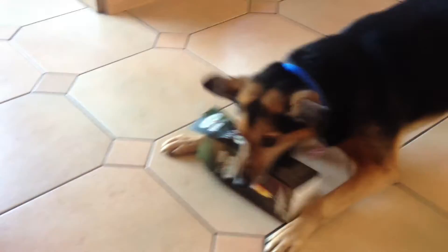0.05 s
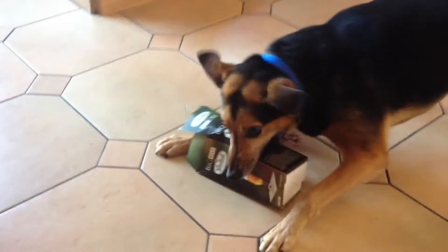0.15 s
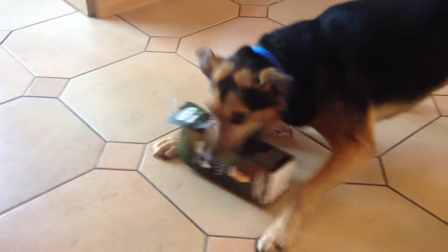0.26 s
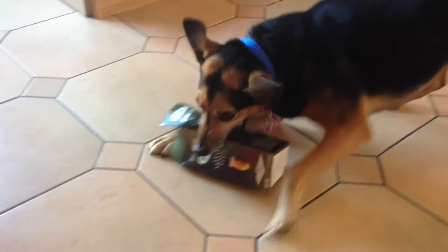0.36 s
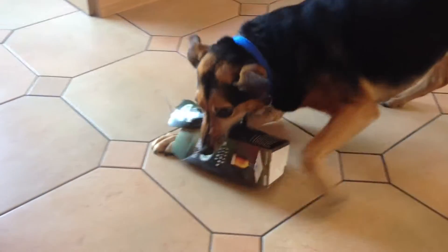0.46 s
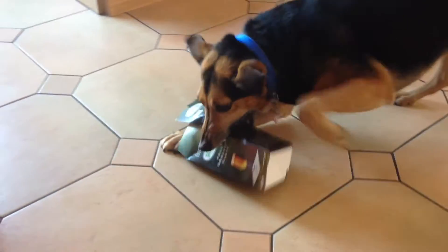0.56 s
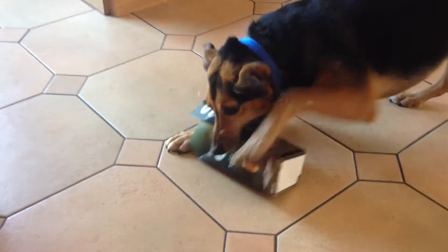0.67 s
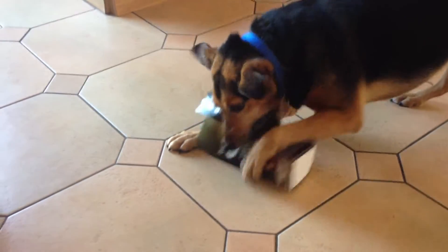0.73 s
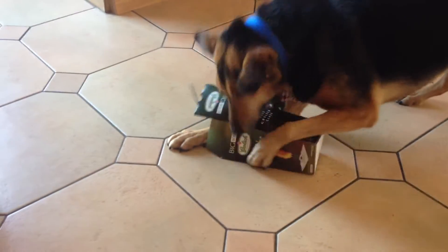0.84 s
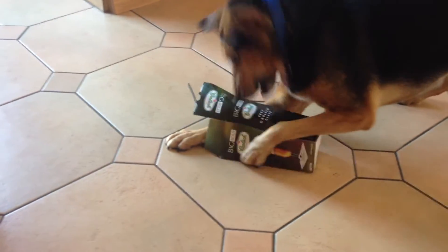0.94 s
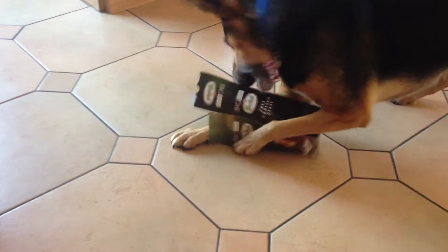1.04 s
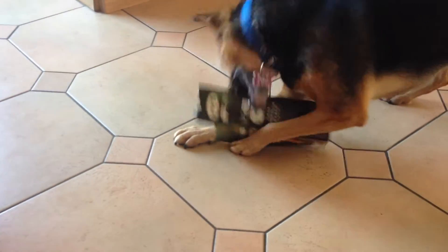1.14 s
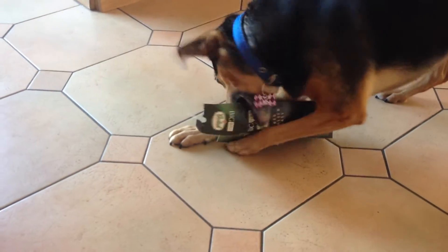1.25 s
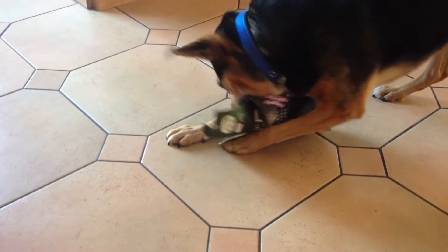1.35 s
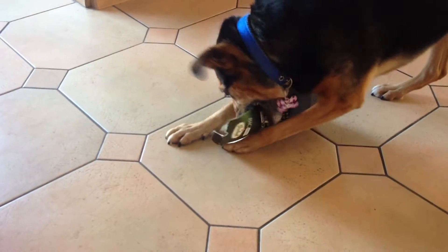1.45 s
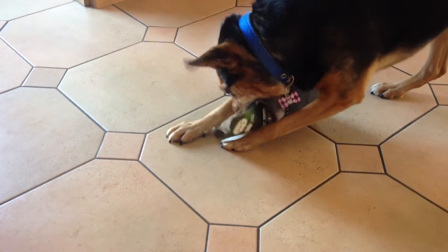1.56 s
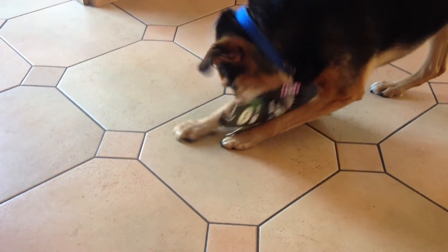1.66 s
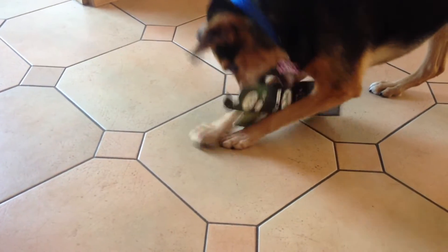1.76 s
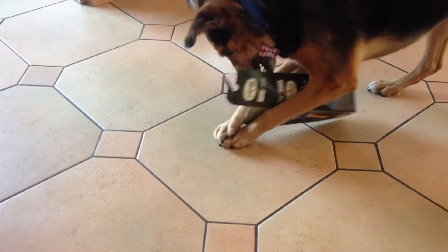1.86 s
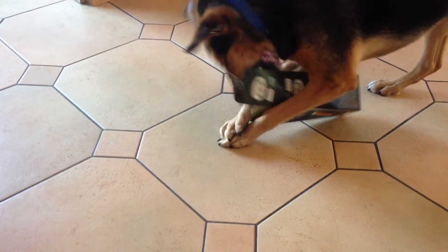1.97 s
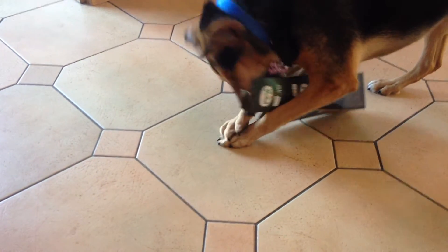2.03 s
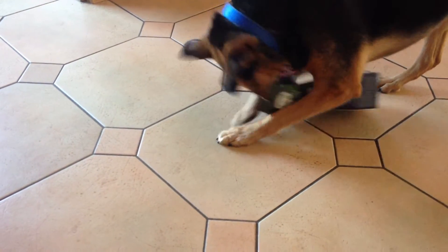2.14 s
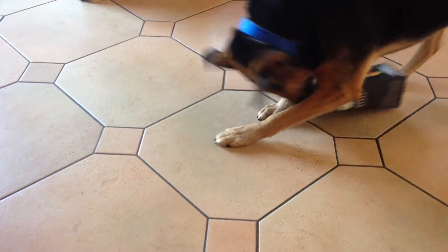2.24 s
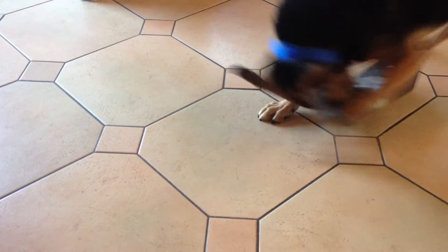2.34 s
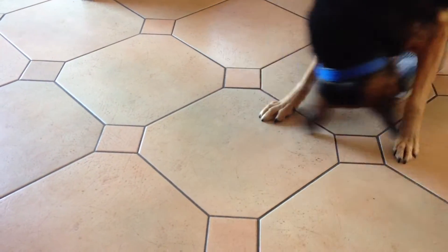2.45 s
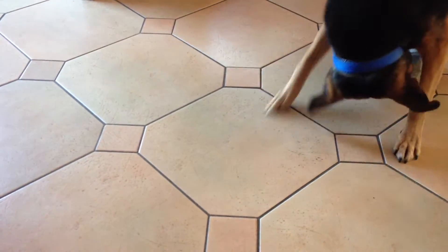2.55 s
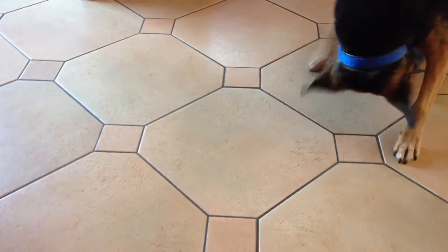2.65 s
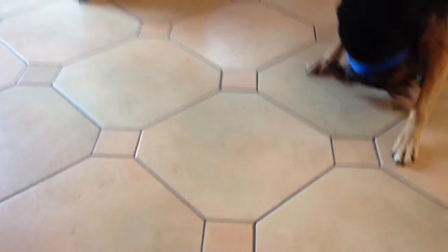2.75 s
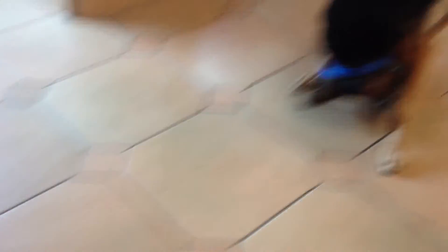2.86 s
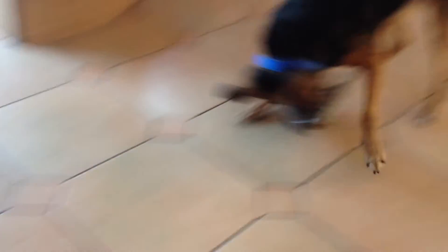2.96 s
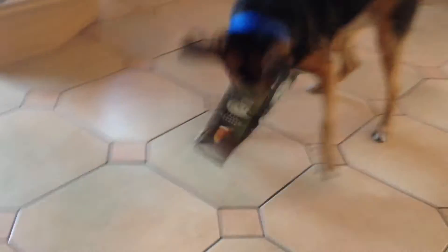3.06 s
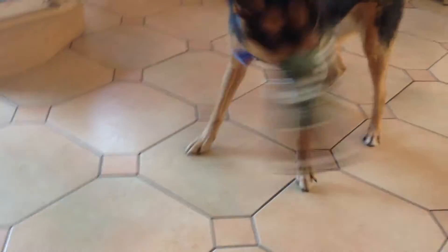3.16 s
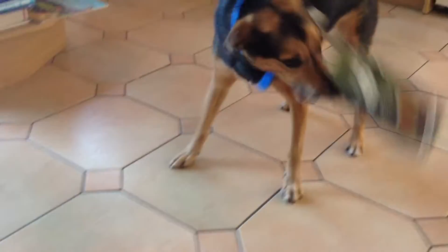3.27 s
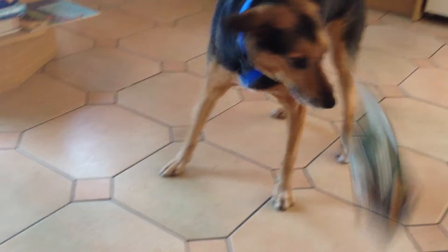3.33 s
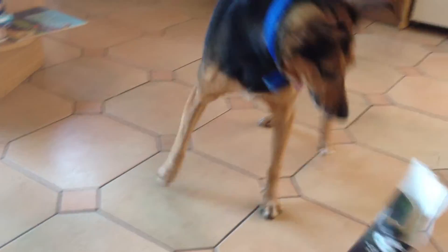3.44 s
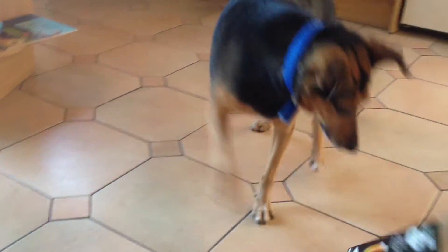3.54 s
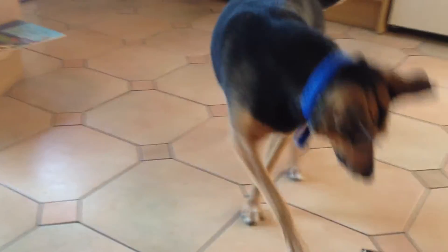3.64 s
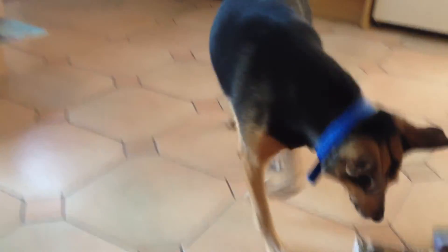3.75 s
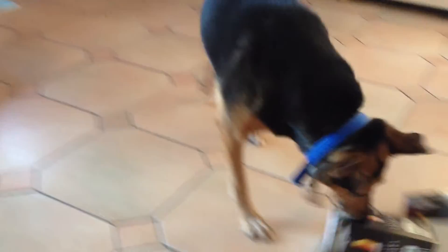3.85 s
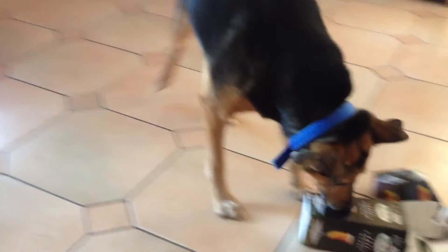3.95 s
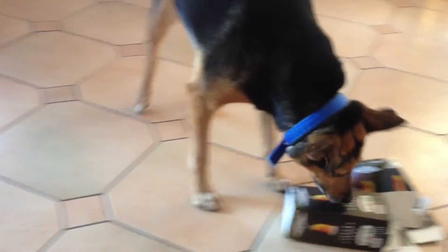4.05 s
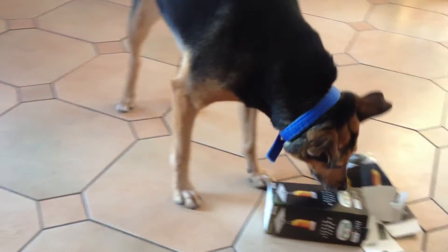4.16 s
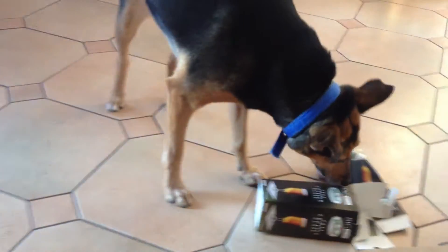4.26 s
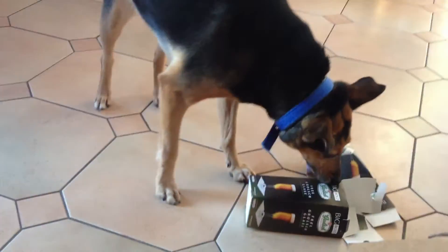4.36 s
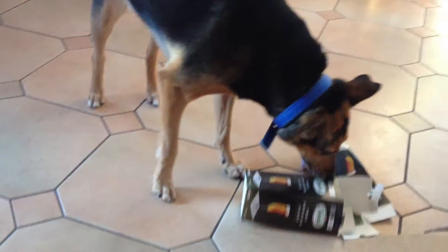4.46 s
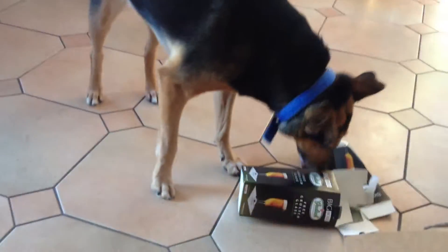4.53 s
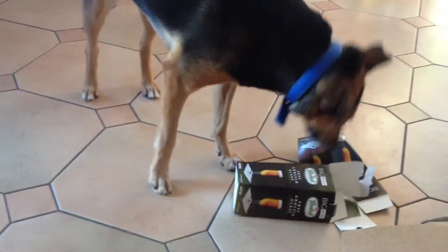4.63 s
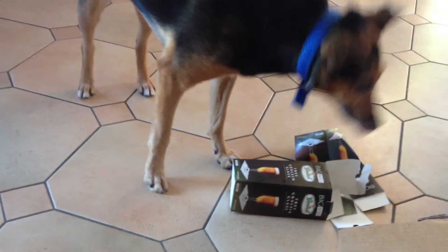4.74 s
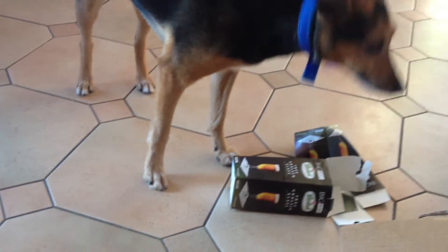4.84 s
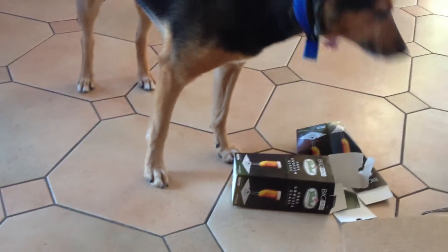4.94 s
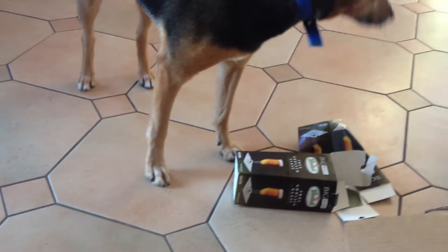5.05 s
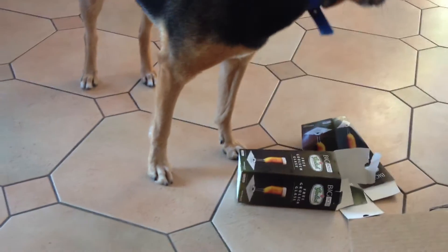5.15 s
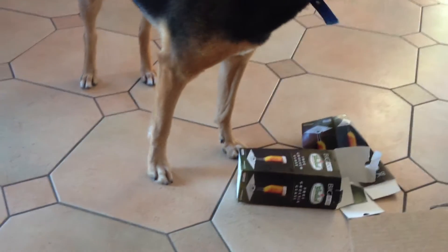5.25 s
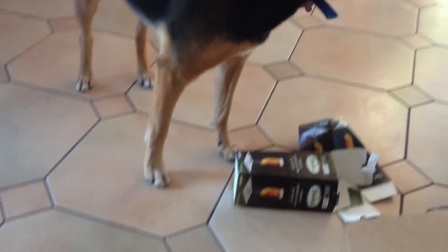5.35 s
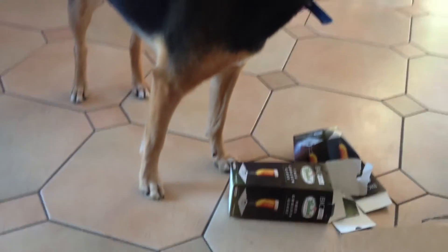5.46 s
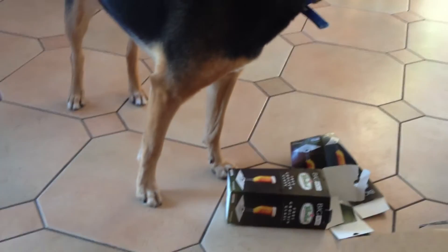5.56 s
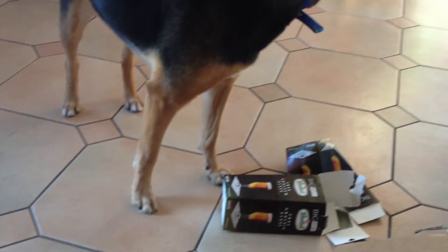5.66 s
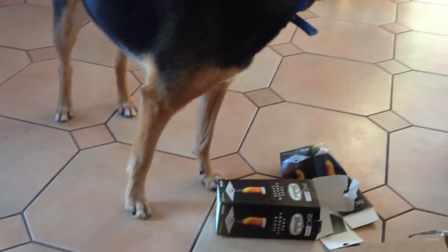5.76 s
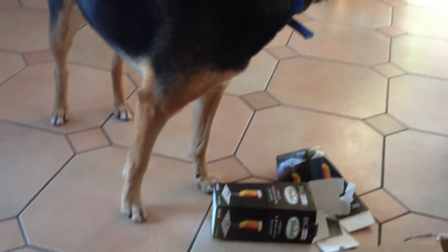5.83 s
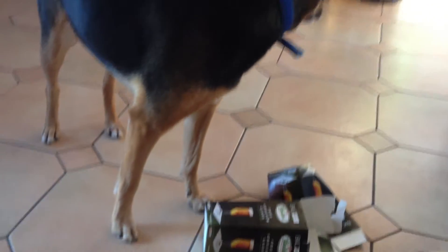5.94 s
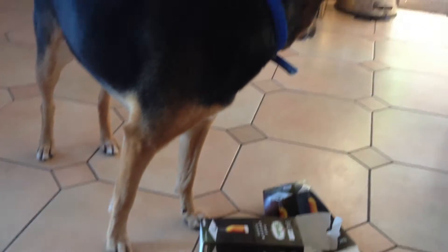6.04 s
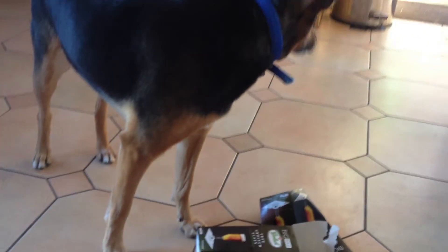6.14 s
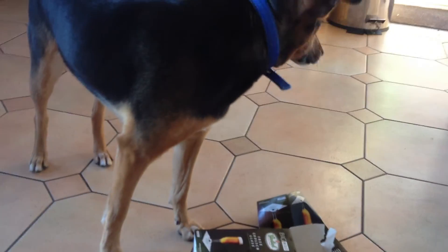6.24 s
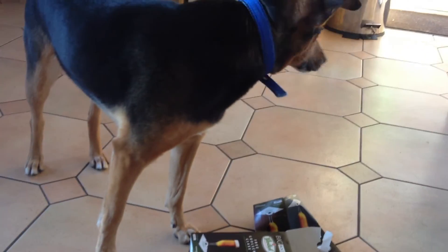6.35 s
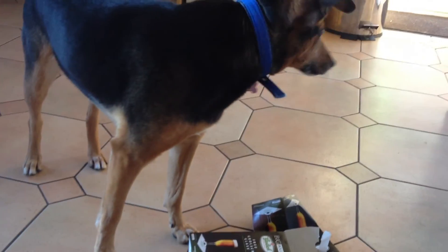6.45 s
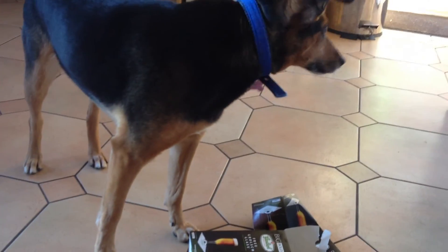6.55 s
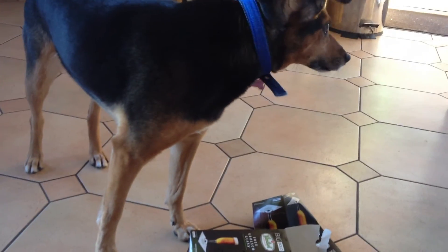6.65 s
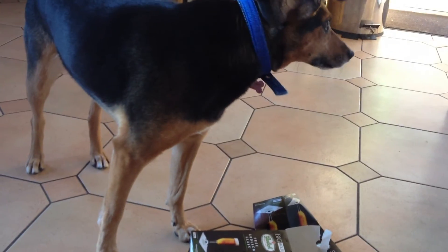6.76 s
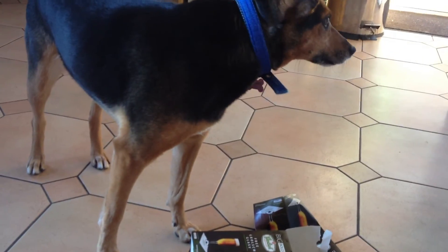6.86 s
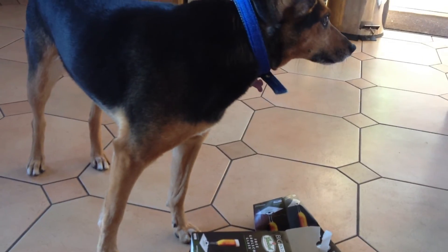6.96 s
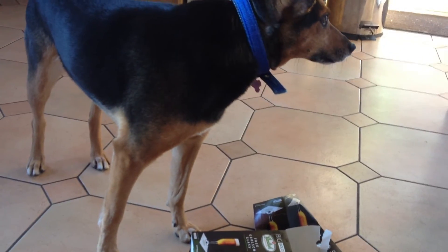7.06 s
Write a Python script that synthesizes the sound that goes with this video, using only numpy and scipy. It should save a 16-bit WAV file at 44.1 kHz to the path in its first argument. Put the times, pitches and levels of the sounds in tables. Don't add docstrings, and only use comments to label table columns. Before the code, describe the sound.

In a hard, reverberant kitchen a dog slaps, crushes and drags a thin cardboard box over tiles, with hollow knocks, snapping folds, claw ticks and a bright clink of collar tags. A hard knock comes early and the loudest when the box lands midway. Then only small scrapes and ticks remain, a thin nose whistle and sparrows chattering outside, over faint fridge hum and hiss from a small close microphone.

```python
import sys
import numpy as np
from scipy import signal
from scipy.fft import rfft, irfft, next_fast_len
from scipy.io import wavfile
from scipy.ndimage import uniform_filter1d, map_coordinates

SR = 44100
rng = np.random.default_rng(int(sys.argv[2]) if len(sys.argv) > 2 else 0)


def generate_wav(signal):
    frames = np.transpose(np.atleast_2d(signal))
    scaled = np.clip(frames, -1, 1) * 32767
    pcm = np.round(scaled).astype(np.int16)
    wavfile.write(sys.argv[1], SR, pcm)


def volts_from_db(level):
    exponent = np.asarray(level, float) / 20
    return 10 ** exponent


N = 313064


def unit(x):
    return x / np.sqrt(np.mean(x ** 2) + 1e-20)


def peak(x):
    return x / np.abs(x).max()


def add(track, s, x):
    part = track[max(round(s * SR), 0):][:len(x)]
    part += x[:len(part)]


def along(points, hz):
    f, v = np.transpose(points)
    return np.interp(np.log(hz + 1), np.log(f + 1), v)


def wobble(rate):
    knots = rng.standard_normal(int(N * rate / SR) + 4)
    return map_coordinates(knots, [np.arange(N) * rate / SR])


def filtered(x, response):
    m = next_fast_len(len(x) + 8192)
    return irfft(rfft(x, m) * response(np.fft.rfftfreq(m, 1 / SR)), m)[:len(x)]


def modes(table):
    return lambda f: sum((-1) ** k * volts_from_db(db) * 1j * f * w / (c * c - f * f + 1j * f * w)
                         for k, (c, w, db) in enumerate(table))


def blows():
    # time in seconds, peak in dB, then thud, edge and crack
    # in dB against the peak
    knocks = [
        (0.657, -21, 0.5, -8, -12.5),
        (0.75, -8, -13, -6.5, -25.5),
        (0.812, -30, -40.5, 6, 1),
        (3.441, -3, -17.5, -11.5, -18.5),
        (3.636, -42, -19.5, -16, -22),
    ]
    slaps = [(0.078, -31.5, 6.5, -1, -19), (0.089, -16.5, -20, -11.5, -33), (0.304, -18.5, -4, -10.5, -29),
             (1.168, -26, -4, -2.5, -32), (1.6666, -37, -2.5, 1, -3), (1.797, -31, -9, -3.5, -28),
             (2.158, -32.5, -34, -11, -22), (2.21, -13.5, -14.5, -10.5, -23), (2.369, -23.5, -13, -3.5, -4),
             (3.258, -23, -2.5, -6, -14.5), (3.296, -25.5, -13.5, -12, -15.5),
             (3.695, -17.5, -5.5, -3, -17.5), (3.9261, -19.5, -5.5, -16.5, -12.5)]
    crushes = [(0.096, -27, -18, -25, -13), (0.334, -24, -19, -32.5, -43), (0.748, -20.5, 0, -17, -25.5),
               (0.986, -45.5, -15, 7, 4), (1.333, -35.5, -9, -2.5, -20), (1.86, -34.5, 2, -5, -11),
               (1.545, -43.5, -6, 3, -21), (2.351, -31.5, 6, -29, -13), (2.387, -28.5, -18, -23, -7),
               (2.714, -25, -2.5, 0, -10.5), (2.732, -24, -17, -15.5, -12), (3.005, -30, 4, -14, -27),
               (3.04, -34, -11, -15.5, -36), (4.559, -42, -12, -5, -5.5), (4.981, -49, -22, -20, -38),
               (5.002, -40.5, -21, -13, -14)]
    out = np.zeros(N)
    for row in knocks:
        add(out, row[0] - .001, blow(row, contact_s=0.017, rise_s=0.00044, width_hz=70))
    for row in slaps:
        add(out, row[0] - .001, blow(row, contact_s=0.049, rise_s=0.00065, width_hz=300))
    for row in crushes:
        add(out, row[0] - .005, blow(row, contact_s=.12, rise_s=.01, width_hz=250))
    return kitchen(out, wet_db=3)


def blow(row, contact_s, rise_s, width_hz):
    # time in seconds, pitch of the free panel in Hz, side panel in dB,
    # deep over small hollow in dB
    lie = [(.08, 594, -10.5, -5.5), (.3, 596, -8, 2), (.66, 660, -9.5, -5), (1.2, 666, -8.5, -10.5),
           (1.67, 660, -9, 14), (1.8, 790, -22, 0), (2.15, 625, -17, -1), (2.21, 790, -3, -0.5),
           (2.39, 775, -4, 1.5), (2.73, 540, -11.5, 6.5), (3.04, 604, -5.5, -6), (3.26, 730, -7.5, 6),
           (3.3, 736, 4, -1), (3.44, 793, -8, -2), (3.695, 703, 0.5, -10), (3.93, 777, -2, -8),
           (4.62, 633, -8, -2), (5.0, 766, -9, 7)]
    # pitch in Hz, width in Hz, level in dB
    folds = [(1250, 330, 0), (2200, 1500, -5), (4060, 3200, -9.5)]
    # pitch in Hz, width in Hz, level in dB
    surface = [(7260, 1700, 9.5), (12700, 9000, 3.5)]
    s, db, thud_db, edge_db, crack_db = row
    when, *columns = np.transpose(lie)
    hz, side_db, deep_db = [np.interp(s, when, column) for column in columns]
    t = np.arange(SR // 6) / SR

    def grit(length_s):
        return (1 - np.exp(-t / rise_s)) * volts_from_db(-60 * t / length_s) * rng.standard_normal(len(t))

    push = np.exp(-(t / 0.00036 - 2) ** 2) * 0.00045 / rise_s + contact_s * 9 * grit(contact_s)
    panel = filtered(push, modes([(0.72 * hz, 1.4 * width_hz, -8), (hz, width_hz, 0),
                                  (1170, 120 + width_hz, side_db)]))
    hollow = modes([(205 * volts_from_db(rng.normal(0, .5)), 60, deep_db / 2),
                    (305 * volts_from_db(rng.normal(0, .5)), 80, -deep_db / 2)])
    thud = filtered(push, lambda f: hollow(f) * 1j * f / (1j * f + 120))

    first_touch = 5 * .0004 / rise_s * (np.arange(len(t)) == 20)
    moved_folds = [(fold_hz * volts_from_db(rng.normal(0, .6)), *rest) for fold_hz, *rest in folds]
    edge = filtered(first_touch + grit(1.2 * contact_s + 0.0064), modes(moved_folds))
    crack = filtered((1 - np.exp(-t / 0.00024)) * grit(1.3 * contact_s + 0.0067), modes(surface))
    parts = peak(panel) + volts_from_db(thud_db) * peak(thud) + volts_from_db(edge_db) * peak(edge) + volts_from_db(crack_db) * peak(crack)
    return volts_from_db(db - 3) * parts


def taps():
    # time in seconds, peak in dB, then thud, edge and crack in dB against the peak
    held = [(0.219, -28, 1, -21, -26.5), (0.342, -17.5, -7, -8, -24), (.7515, -12.5, -13.5, -3.5, -19),
            (1.036, -22.5, -9, -1.5, -11), (1.14, -29, 2, -17, -11), (1.197, -13.5, -24, -2.5, -24),
            (1.814, -27, -5, -24, -19), (1.872, -37, -1.5, -21, -9), (1.942, -26.5, -16, -36, -35),
            (3.695, -10.5, -12.5, -33, -30), (3.925, -20.5, -3.5, -2.5, -8), (4.613, -35, 7.5, -3, -7)]
    # time in seconds, peak in dB, edge in dB
    ticks = [(0.0912, -39, 12), (0.0963, -33, 9), (.221, -44, -2), (.265, -42, -10), (.278, -46, 10),
             (.3035, -40, 0), (0.3246, -31, -2), (.333, -33, 7), (0.355, -26.5, -22), (0.635, -42, -3),
             (0.7026, -35, 11), (.706, -29.5, 8), (0.7105, -38.5, 14), (0.737, -20.5, -1),
             (.7405, -26.5, 11), (0.7453, -22, 4), (0.7515, -19, 3), (0.8103, -32, 1), (.986, -41, -6),
             (1.142, -41, 4), (1.171, -27, -4), (1.2, -32, 4), (1.5444, -53, 11), (1.666, -44, -5),
             (1.679, -37, -3), (1.765, -44, -8), (1.7947, -38, 9), (2.157, -55, 4), (2.348, -45, -2),
             (2.3874, -20.5, -16), (2.579, -42, -12), (2.599, -28.5, -17), (2.619, -44, -15),
             (2.674, -32, -14), (2.684, -33, -14), (2.7177, -26, -8), (3.0883, -42, 9), (3.184, -27, -27),
             (3.298, -39.5, 14.5), (3.444, -20, 4), (3.702, -22, -4), (4.3958, -53, -8), (4.4947, -39, -20),
             (4.785, -46, -5), (4.8612, -56.5, -12), (4.8947, -62, -12), (4.9082, -61, -8), (4.94, -55, -1),
             (5.0037, -42.5, 7), (5.514, -56, -20), (5.681, -49, -1.5)]
    out = np.zeros(N)
    for row in held:
        add(out, row[0] - .001, blow(row, contact_s=.008, rise_s=.0004, width_hz=110))
    for s, db, edge_db in ticks:
        row = (s, db - 20, -10, edge_db + 20, 20)
        add(out, s - .0007, blow(row, contact_s=.002, rise_s=.0004, width_hz=300))
    return kitchen(out, wet_db=-2)


def rubbing():
    # low end in Hz, high end in Hz
    bands = [(110, 370), (420, 1500), (1500, 8300), (6000, 17000)]
    # frequency in Hz, level in dB per Hz
    card = [(35, -69.5), (60, -20), (207, -15), (398, -13.5), (651, -11), (803, -12), (1700, -21.5),
            (2090, -17.5), (5090, -21.5), (6580, -22), (9570, -20), (14600, -19.5), (16000, -60)]
    # start in seconds, length in seconds, pitch in Hz, level in dB, spread in Hz
    scrapes = [(.748, .012, 2130, -34, 200), (2.415, .035, 3450, -44, 600), (2.945, .06, 620, -39, 25),
               (3.035, .02, 1830, -50, 80), (3.04, .02, 1250, -47, 80), (3.71, .07, 1220, -41, 90),
               (3.935, .06, 1270, -45, 80), (3.3, .039, 2660, -53, 400), (3.465, .07, 775, -30, 50),
               (3.55, .075, 775, -43, 50), (3.635, .055, 790, -45, 50), (4.378, .06, 1200, -65, 120),
               (4.495, .04, 5870, -65, 400), (5.45, .19, 3310, -67, 893)]
    skids = [
        (.56, .079, 1485, -57, 298),
        (.705, .044, 1450, -43, 200),
        (2.875, .07, 500, -46, 40),
    ]
    slips = (rng.random(N) < .02) * rng.uniform(-0.94, 1, N) ** 3
    clumps = volts_from_db(1.5 * wobble(40) + 2.5 * wobble(130))
    singing = glides(bent(scrapes, 1) + bent(skids, 1.24), trill=0, shake_rate=700)
    out = singing * volts_from_db(1.1 * wobble(66))
    for (lo, hi), gain in zip(bands, movements()):
        drive = (.7 * unit(slips) + rng.standard_normal(N)) * clumps * volts_from_db(1.5 * wobble(25))

        def band(f):
            slopes = np.sqrt((1 + (lo / (f + 1)) ** 8) * (1 + (f / hi) ** 8))
            return volts_from_db(along(card, np.minimum(f, 14500))) / slopes

        out += volts_from_db(-5.5) * gain * unit(filtered(drive, band))
    return kitchen(out, wet_db=4.5)


def movements():
    # time in seconds, length in seconds, body in dB, then drumming
    # and rasp in dB against the body
    jolts = [
        (0.0, 0.033, -44, 10.5, -7),
        (2.223, 0.059, -31.5, -4.5, -12.5),
        (2.363, 0.13, -33, -4.5, -13),
        (3.259, 0.031, -37, -24, -10),
        (3.694, 0.13, -50.5, 12, 9.5),
        (3.924, 0.15, -39.5, -7, -6.5),
        (4.387, 0.13, -60.5, -4, 7),
        (5.0, 0.068, -60, 12.5, 9),
    ]
    # time in seconds, length in seconds, body in dB, drumming in dB
    presses = [(.11, 0.31, -61.5, 17.5), (.244, 0.28, -49, 3), (.476, 0.29, -69.5, -7.5),
               (.73, 0.28, -41, -10), (.896, 0.11, -50, -20), (1.01, 0.055, -41, -4),
               (1.12, 0.17, -44.5, -1), (1.26, 0.31, -48.5, -23), (1.47, 0.72, -53, -12.5),
               (1.753, .15, -68, -1), (1.865, 1, -54.5, 0), (2.16, 0.068, -64, 11), (2.674, 0.41, -50, 2.5),
               (2.78, 0.24, -47.5, -11.5), (2.62, 0.067, -45, 4), (2.885, 0.05, -46.5, -8.5),
               (2.958, 0.035, -46.5, 2), (1.36, 0.13, -44, -8), (3.058, 0.098, -44, -7.5),
               (3.422, 0.058, -46.5, -13.5), (3.52, 0.56, -52.5, -5), (3.754, 0.05, -39.5, -17),
               (4.08, 0.044, -48, -29), (4.21, 0.084, -65.5, -14), (4.644, 0.072, -54, -0.5),
               (4.748, 0.14, -66.5, -8), (5.518, 0.26, -70, -4)]
    # time in seconds, length in seconds, rasp in dB, fizz in dB
    drags = [(.06, 0.43, -54, 4), (.294, 0.12, -50, -14), (.408, 0.064, -50, -5), (.55, 0.2, -60, -12.5),
             (.66, 0.11, -55.5, -11.5), (.73, 0.13, -64.5, 16.5), (.842, 0.1, -47, -4),
             (1.01, 0.052, -45, 0), (1.12, 0.2, -44.5, -5.5), (1.47, 0.9, -54.5, -36),
             (1.753, 0.18, -53.5, -2), (1.97, 1, -58.5, -5.5), (2.52, .15, -69, 2), (2.6, 0.034, -63, 21.5),
             (2.69, 0.045, -50.5, 8), (2.4, 0.082, -53, 13), (1.57, 0.06, -56, -22), (1.89, 0.036, -56, -8),
             (1.42, 0.066, -55, -17), (4.42, .06, -58.5, -12), (2.89, .1, -58.5, 7),
             (1.35, 0.11, -50.5, -17), (.36, .04, -54, 4.5), (2.764, 0.069, -41.5, -21),
             (2.958, 0.12, -47, 2), (3.23, 0.3, -54, -12.5), (3.275, 0.023, -53.5, 4.5),
             (3.498, 0.097, -46.5, -13), (4.3, 0.27, -68.5, 0), (4.5, 0.2, -57, -13),
             (4.644, 0.19, -57, -6), (5.518, 0.34, -67, -19)]

    def jolt(pick):
        return [(s, .012, length, db + pick(drum, rasp)) for s, length, db, drum, rasp in jolts]

    def swell(rows, tilted):
        return [(s, 0.78 * length, length, db + tilted * tilt) for s, length, db, tilt in rows]

    drumming = strokes(jolt(lambda drum, rasp: drum) + swell(presses, True))
    body = strokes(jolt(lambda drum, rasp: 0) + swell(presses, False))
    rasping = strokes(jolt(lambda drum, rasp: rasp) + swell(drags, False))
    fizz = strokes(jolt(lambda drum, rasp: rasp - 19.5) + swell(drags, True))
    return [drumming, body, rasping, fizz]


def strokes(moves):
    s, rise, fall, db = np.transpose(moves)[..., None]
    fade_db = 15.5
    ms = np.arange(0, N / SR, 1 / 1000)
    lost = np.maximum((s - ms) / np.abs(rise), (ms - s) / np.abs(fall))
    gain = np.sqrt(np.sum(volts_from_db(db - fade_db * lost) ** 2, axis=0))
    return np.interp(np.arange(N) / SR, ms, gain)


def glides(table, trill, shake_rate):
    out, shake = np.zeros(N), wobble(shake_rate)
    for s, length, first_hz, last_hz, db, depth_hz in table:
        u = np.arange(int(length * SR)) / (length * SR)
        buzz = trill * np.sin(2 * np.pi * 330 * length * u) + np.roll(shake, -round(s * SR))[:len(u)]
        hz = first_hz + (last_hz - first_hz) * u ** .8 + depth_hz * buzz
        swell = np.sin(np.pi * u ** 0.73) ** .7
        add(out, s, volts_from_db(db) * swell * np.sin(2 * np.pi * np.cumsum(hz) / SR))
    return out


def bent(rows, ratio):
    return [(s, length, hz, hz * ratio, db, depth) for s, length, hz, db, depth in rows]


def collar():
    # pitch in Hz, time to fall 60 dB in seconds
    tags = [
        [(6782, .12)],
        [(7840, .17), (14220, .13)],
        [(12020, .06)],
        [(14420, .17)],
    ]
    # time in seconds, then the level of each tag in dB
    clinks = [
        (0.45, -52.5, -52, -72, -52),
        (1.150, -53, -49, -34, -44.5),
        (1.163, -28.5, -38, -32, -32),
        (1.18, -37, -48, -50, -40),
        (1.236, -48, -58, -70, -58),
        (3.402, -50, -62.5, -48.5, -55),
        (3.411, -43.5, -59, -57.5, -36),
        (5.04, -54, -44.5, -49, -47),
        (5.063, -54, -62, -71, -65),
    ]
    # time in seconds, level in dB
    buckle = [
        (0.0, -48.5),
        (3.844, -57),
        (3.895, -59),
    ]
    out, t = np.zeros(N), np.arange(SR // 3) / SR

    def ring(hz, t60):
        return volts_from_db(-60 * t / t60) * np.sin(2 * np.pi * hz * t) * (1 - np.exp(-t / 0.00054))

    for s, *levels in clinks:
        tick = .15 * volts_from_db(max(levels) - 60 * t / .004) * np.diff(rng.standard_normal(len(t) + 1))
        ringing = sum(volts_from_db(db) * ring(hz, t60) for db, tag in zip(levels, tags) for hz, t60 in tag)
        add(out, s, tick + ringing)
    for s, db in buckle:
        add(out, s, volts_from_db(db) * ring(5866, .4))
    return kitchen(out, wet_db=-6.0)


def thumps():
    # start in seconds, level in dB, length in seconds
    weights = [(.068, -67, .08), (.324, -59, 0.099), (.657, -58, .08), (.74, -56.5, .12),
               (2.38, -72, 0.074), (2.6, -67, .08), (2.72, -70, .08), (3.435, -59, .08), (3.69, -65, 0.075),
               (3.92, -54, 0.081), (5.0, -85, .08)]
    # pitch in Hz, width in Hz, level in dB
    floor = [(32.02, 40, -3.5), (95, 80, 3.5)]
    out = np.zeros(N)
    for s, db, length in weights:
        u = np.arange(int(length * SR)) / (length * SR)
        rumble = unit(filtered(rng.standard_normal(len(u)), modes(floor)))
        add(out, s, volts_from_db(db) * np.sin(np.pi * np.sqrt(u)) ** 2 * rumble)
    return out


def nose():
    # time in seconds, pitch in Hz, level in dB
    sniff = [
        (5.489, 12240, -80),
        (5.51, 13270, -76),
        (5.55, 13600, -76),
        (5.6, 12900, -73),
        (5.645, 11330, -75.5),
        (5.66, 10900, -95),
    ]
    s, hz, db = np.transpose(sniff)
    t = np.arange(N) / SR
    pitch = uniform_filter1d(np.interp(t, s, hz), size=600) + 60 * wobble(200)
    phase = 2 * np.pi * np.cumsum(pitch) / SR
    nostrils = np.sin(phase) + volts_from_db(-9 + 5 * wobble(25)) * np.sin(.83 * phase)
    return volts_from_db(np.interp(t, s, db, left=-140, right=-140) + 3 * wobble(40)) * nostrils


def sparrows():
    # start in seconds, length in seconds, pitch in Hz, level in dB, trill depth in Hz
    chirps = [(2.69, 0.023, 4520, -57, 20), (2.712, 0.022, 4480, -37.5, 30), (5.375, .03, 11600, -80, 30),
              (6.7, .04, 2298, -75, 39), (6.72, .2, 3730, -77, 60), (5.31, 0.026, 11600, -78.5, 30),
              (4.93, 0.048, 3950, -65, 150), (5.458, 0.065, 6110, -61, 180),
              (5.693, 0.053, 5730, -60.5, 104), (5.693, 0.046, 6260, -63, 87), (5.79, .04, 7410, -63.5, 90),
              (5.82, .11, 4290, -67.5, 199), (5.905, 0.065, 5630, -62, 85), (5.905, 0.058, 6200, -58.5, 64),
              (5.93, 0.045, 2310, -73, 47), (6.01, 0.058, 7620, -66, 60), (6.03, 0.065, 3980, -68, 200),
              (6.301, .04, 5350, -67, 104), (6.329, 0.1, 3980, -65.5, 300), (6.38, 0.21, 4900, -66.5, 300),
              (6.385, .05, 2300, -75.5, 40.1), (6.70, 0.22, 4600, -64.5, 190), (6.82, 0.12, 4780, -68, 146),
              (6.883, 0.062, 6420, -70.5, 250.5)]
    drops = [
        (6.845, .05, 5900, -61.5, 200.1),
        (6.995, 0.12, 7200, -55, 199.8),
    ]
    # start in seconds, length in seconds, first pitch in Hz, level in dB
    buzzes = [
        (6.053, 0.064, 2790, -69),
        (6.336, 0.093, 3290, -72.5),
        (6.999, .13, 3470, -67),
    ]
    clear = [
        (4.829, 0.12, 4970, -63.5),
        (5.308, 0.16, 5200, -63),
        (5.763, .13, 4915, -61.5),
        (6.2, 0.11, 4840, -59),
    ]
    sag_per_s, clear_hz, buzz_hz = 1.1, 35, 285
    notes = bent(chirps, 1) + bent(drops, .93) + bent([(*row, buzz_hz) for row in buzzes], 0.85)
    notes += [(s, length, hz, hz * (1 - sag_per_s * length), db, clear_hz) for s, length, hz, db in clear]
    return kitchen(glides(notes, trill=1.8, shake_rate=500), wet_db=0)


def room_tone():
    # frequency in Hz, level in dB per Hz
    air_colour = [(30, -39), (60, -28.5), (100, -12.5), (160, -2), (210, -4.5), (300, -3.5), (1000, -7),
                  (2000, -9.5), (3200, -13), (4500, -11), (6300, -15.5), (8000, -15.5), (10000, -25.5),
                  (13500, -15.5)]
    # pitch in Hz, level in dB rms
    motor = [(209.9, -80.5), (845.2, -86.5), (1001, -83.5), (1550, -87), (2299, -97.5)]
    t = np.arange(N) / SR
    air = unit(filtered(rng.standard_normal(N), lambda f: volts_from_db(along(air_colour, f))))
    hum = sum(volts_from_db(db + 4 + 1.8 * wobble(9.4)) * np.sin(2 * np.pi * hz * t + .8 * wobble(6.7))
              for hz, db in motor)
    return volts_from_db(-68 + 0.28 * wobble(1.7)) * air + hum


def tail():
    # frequency in Hz, time to fall 60 dB in seconds
    decay = [(100, 0.43), (300, 0.39), (800, 0.32), (2000, 0.31), (5000, 0.33), (12000, 0.24)]
    hz, t, z = signal.stft(rng.standard_normal(SR * 3 // 4), SR, nperseg=256)
    h = signal.istft(z * volts_from_db(-60 * t / along(decay, hz)[:, None]), SR, nperseg=256)[1]
    h = h * (1 - np.exp(-np.arange(len(h)) / SR / 0.00072))
    return h / np.linalg.norm(h)


def kitchen(x, wet_db):
    out, step = x.copy(), SR // 4
    for i in range(0, N, step):
        if x[i:i + step].any():
            add(out, i / SR, volts_from_db(wet_db) * signal.fftconvolve(x[i:i + step], tail()))
    return out


def scene():
    # frequency in Hz, level in dB
    housing = [(3800, 0.5), (4750, 1.5), (5150, -3.5), (6000, 0.5), (8400, -0.5), (9300, -4.5),
               (15000, -1.5)]
    near = blows() + rubbing() + collar() + nose() + taps()

    def port(f):
        return (1j * f / (1j * f + 110)) ** 3 * volts_from_db(along(housing, f))

    return (filtered(near, port) + thumps() + sparrows() + room_tone())[None]


def band_limit(x):
    return signal.sosfilt(signal.butter(12, 16300, fs=SR, output="sos"), x)


def record(dry):
    top_hz = 15420
    mix = filtered(dry[0], lambda f: 1 / np.sqrt(1 + (f / top_hz) ** 240))[None]
    return band_limit(mix)


dry = scene()
out = record(dry)
generate_wav(out)
```